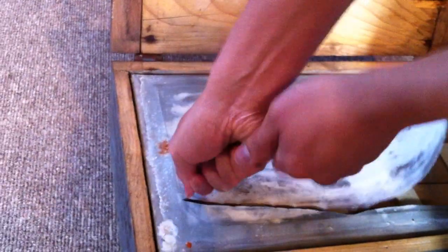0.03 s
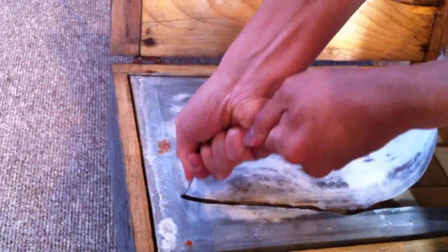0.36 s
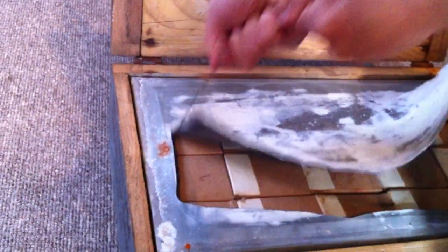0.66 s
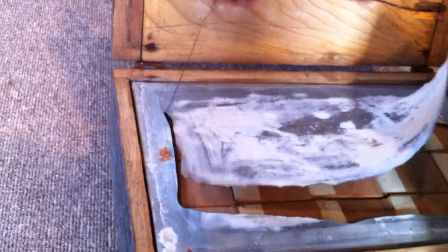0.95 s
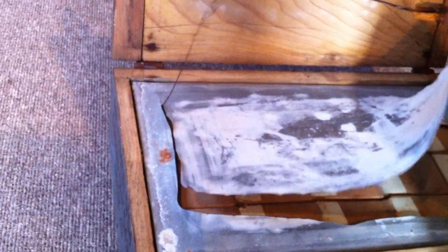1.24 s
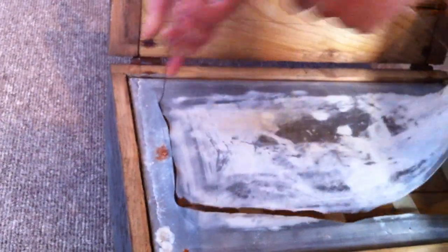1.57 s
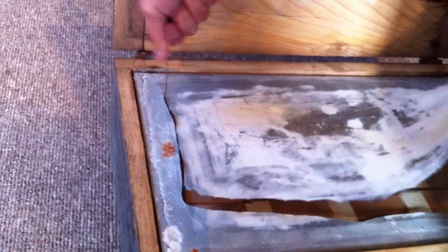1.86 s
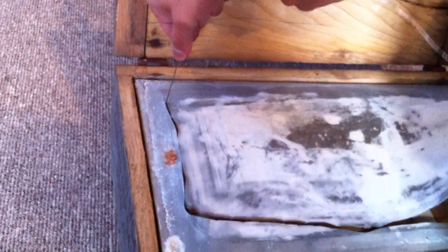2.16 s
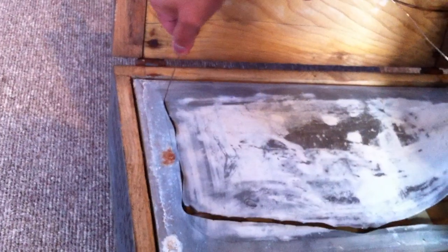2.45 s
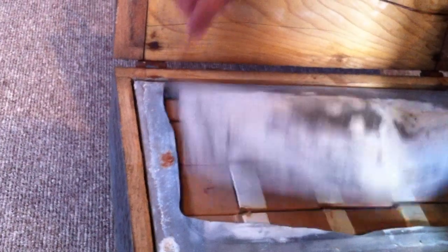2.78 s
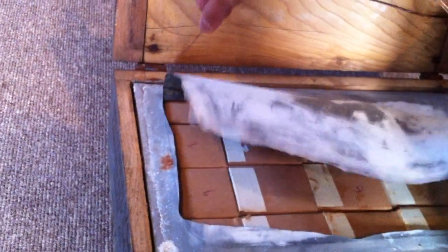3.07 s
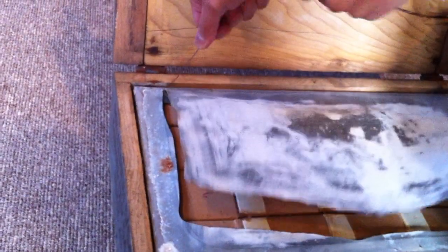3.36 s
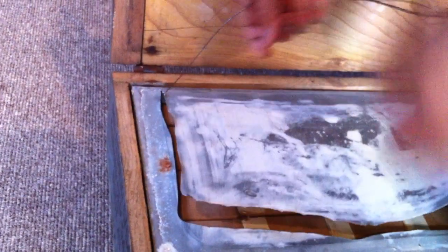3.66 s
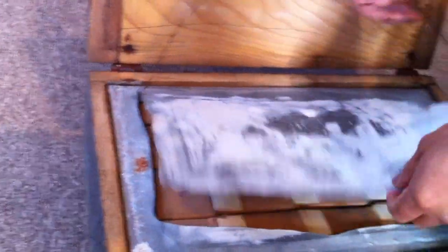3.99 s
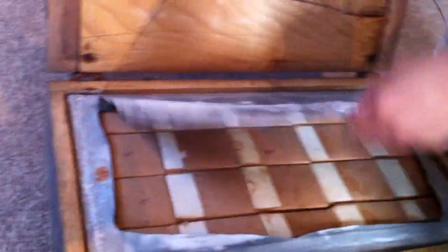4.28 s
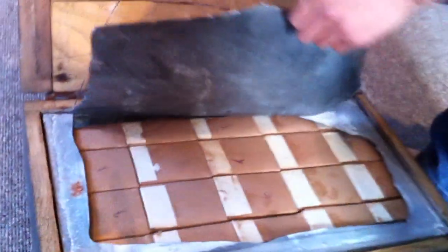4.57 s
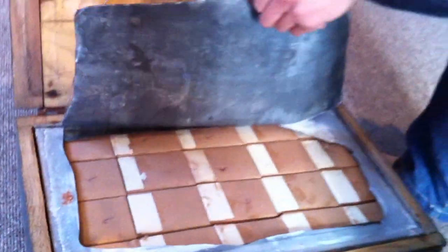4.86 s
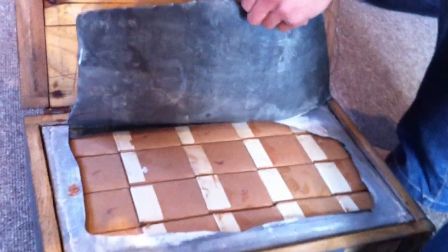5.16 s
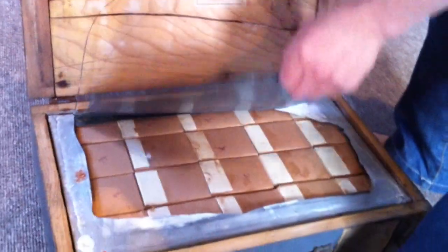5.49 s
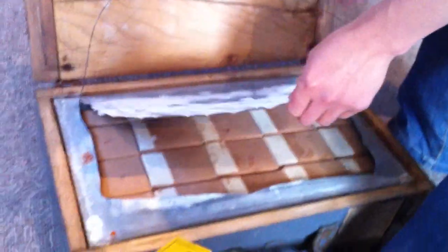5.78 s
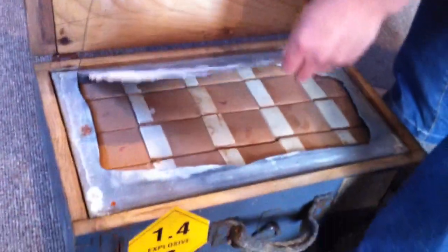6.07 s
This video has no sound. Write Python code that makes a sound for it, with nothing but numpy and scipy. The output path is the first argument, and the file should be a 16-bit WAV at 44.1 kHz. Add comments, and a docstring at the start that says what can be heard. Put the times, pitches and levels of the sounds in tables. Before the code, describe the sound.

Thin sheet metal is torn open with a pull wire and bent back by hand, popping, buckling and knocking in a small, quiet room.

```python
"""A faint slither of pull wire, then the thin sheet-metal liner of a wooden crate rips open and is peeled
back by hand. The seam gives way in runs of tiny cracks; the sheet snaps, buckles, wobbles and knocks
dully on the load below. Wire and fingers rub along the metal, and the released wire sings faintly.
Heard close to the crate in a small, quiet room, on one small microphone."""
import sys
import numpy as np
from scipy import signal
from scipy.fft import rfft, irfft
from scipy.io import wavfile
from scipy.ndimage import uniform_filter1d

SR = 44100
rng = np.random.default_rng(int(sys.argv[2]) if len(sys.argv) > 2 else 0)


def unload_wav(signal):
    """Save mono or channel-first audio to the path in sys.argv[1] as 16-bit WAV at rate SR, clipped to [-1, 1]."""
    wavfile.write(
        sys.argv[1],
        SR,
        np.round(np.clip(np.atleast_2d(signal).T, -1, 1) * 32767).astype(np.int16),
    )


N = 270333
TIME = np.arange(N) / SR


def snaps(typical_hz=1610, typical_t60_s=0.083, clang_db_per_octave=8.5, t60_growth_per_octave=1.5):
    """The sheet pops through or the seam breaks; a larger patch is lower, clangs more and rings longer."""
    # pops of the sheet: start_s, level_db (near 2 kHz), pitch_hz, edge_db, sizzle_db
    pops = [(0.5171, 9, 1100, -5, -4), (0.5391, 22, 1620, -16, -18.5), (0.554, 8.5, 2140, -11, -2.5),
            (0.7342, 8, 2190, -13.5, -12), (0.7713, 9, 2020, -14, -11), (0.786, 11.5, 2130, -23, -27),
            (0.805, 3.5, 1320, -27, -3), (0.871, 4, 1900, -12, -10.5), (1.317, -16, 2140, -7.5, -9),
            (2.1129, 7, 1760, -10.5, -13.5), (2.2187, 20.5, 2520, -5.5, -19.5),
            (2.8565, 18.5, 2050, -12, -25), (2.89, 11.5, 2020, 2, -1.5), (2.9041, 18.5, 1670, -35.5, -27),
            (2.9145, -6.5, 1360, -15.5, -11.5), (2.9464, 18, 2060, -11, -18.5),
            (3.1486, -9.5, 1340, -11, -17), (3.222, -14.5, 1700, -13.5, -16),
            (3.5102, -13, 2670, -4, -29.5), (4.0383, -26.5, 2300, -7, -20.5), (4.1632, 3.5, 2100, -6, -12),
            (4.314, -14.5, 1680, -19, -27), (4.3516, -13.5, 850, -13.5, -16), (4.377, 13, 783, -26.5, -46),
            (4.533, -8, 1450, -3, -4.5), (4.6, -7.5, 1870, -7.5, -8.5), (4.7059, -2.5, 1500, -18, -30),
            (5.0894, 16, 882, 1.5, -5), (5.0978, 21, 1120, -24, -20), (5.1527, 15, 1165, -4.5, -14.5),
            (5.164, 12.5, 900, -16, -25.5), (5.187, -4.5, 690, -12, -6), (5.2625, 6.5, 1250, -4.5, -10),
            (5.3838, -3.5, 915, -2.5, -8), (5.4937, 19.5, 2210, -10.5, -26)]
    # corners of a snap's spectrum, from sub-bass to sizzle: frequency_hz
    corners_hz = [30, 110, 165, 850, 2200, 5000, 7300, 9000, 14000]
    out = np.zeros(N)
    overtone_ratios = rng.uniform(1.2, 4.5, (len(pops), 9))   # inharmonic, so the sheet sounds tinny
    for (start_s, level_db, pitch_hz, edge, sizzle), ratios in zip(pops, overtone_ratios):
        octaves_down = np.log2(typical_hz / pitch_hz)
        clang = clang_db_per_octave * octaves_down
        t60_s = typical_t60_s * t60_growth_per_octave ** octaves_down
        thump = -7 - 0.3 * level_db   # the bass grows more slowly than the rest of the snap
        corners_db = [thump - 10, thump - 10, thump, clang, 0, edge, edge - 1, sizzle + 1, sizzle - 1]
        colour_db = at_hz(np.column_stack([corners_hz, corners_db]), bins())
        patch_db = 4.5 * (bump(pitch_hz, 0.52 * pitch_hz) - 0.3)
        overtones_db = 5 * np.max([bump(pitch_hz * ratio, width_hz=90) for ratio in ratios], axis=0)
        ring = burst(t60_s, crack=1.3, crack_s=0.0018, rise_s=0.0005)
        add(out, start_s, shape(ring, level_db + colour_db + patch_db + overtones_db))
    return out


def tearing():
    """The wire splits the seam in runs of tiny cracks of uneven size."""
    # runs of the tear: start_s, length_s, level_db
    runs = [(0.517, 0.075, -30.5), (0.58, 0.31, -36.5), (0.645, 0.039, -28.5), (0.735, 0.093, -32),
            (0.908, 0.013, -38), (2.88, 0.066, -37.5)]
    # spectrum of the cracks: frequency_hz, level_db
    colour = [(40, -13), (100, -13), (160, -16.5), (330, -1), (620, 7.5), (950, -3), (1500, 4.5), (2400, 0),
              (3500, -8), (7000, -12.5), (12000, -16), (16000, -16)]
    gain = strokes(runs, attack_s=0.0096, release_s=0.011, swell_db=1, rest_db=-110)
    return gain * friction(colour, per_s=1800, spread_db=3, jerk_db=0.5)


def knocks(lowest_hz=150, pitch_share=0.54):
    """Soft contacts excite the low modes, one of them most; the softer the contact, the lower that mode."""
    # sheet and hands striking the crate: start_s, level_db, cutoff_hz, t60_s
    contacts = [(0.458, 10, 920, 0.029), (0.518, 17.5, 644, 0.07), (0.543, 23.5, 630, 0.013),
                (0.555, 12.5, 480, 0.075), (0.587, 14, 323, 0.036), (0.874, 10, 540, 0.067),
                (1.149, 3, 317, 0.06), (1.413, -4, 540, 0.091), (1.532, 13.5, 916, 0.15),
                (1.753, 10, 443, 0.03), (2.19, 4.5, 300, 0.022), (2.659, -11, 500, 0.08),
                (2.95, 15, 384, 0.066), (3.344, -12.5, 430, 0.04), (4.366, 5.5, 760, 0.092),
                (4.378, 12, 804, 0.1), (4.413, 0, 400, 0.12), (4.475, 7.5, 1090, 0.06),
                (4.918, -10, 1250, 0.32), (5.403, 4, 1220, 0.23), (5.849, 1.5, 610, 0.17),
                (6.004, 1.5, 680, 0.091), (6.032, 0, 520, 0.095), (6.094, -2.5, 498, 0.05)]
    out, hz = np.zeros(N), bins() + 1
    highpass_power = 1 / (1 + (lowest_hz / hz) ** 8) + 0.00078
    for start_s, level_db, cutoff_hz, t60_s in contacts:
        pitch_hz = pitch_share * cutoff_hz
        lowpass_power = 1 / (1 + (hz / cutoff_hz) ** 6) + 1e-5
        band_db = 10 * np.log10(lowpass_power * highpass_power)
        mode_db = 3 * (bump(pitch_hz, 0.62 * pitch_hz) - 0.3)
        ring = burst(t60_s, crack=0.44, crack_s=0.0053, rise_s=0.001)
        add(out, start_s, shape(ring, level_db + band_db + mode_db))
    return out


def rubbing(treble_hz=4000):
    """Metal and fingers drag over the sheet in fine slips; each stroke has its own share of treble."""
    # rubbing strokes: start_s, length_s, level_db, brightness_db
    rubs = [(0.095, 0.025, -60, 0), (0.291, 0.019, -54, -13), (0.999, 0.073, -45, -3.5),
            (1.11, 0.048, -40, 0), (1.289, 0.022, -60.5, 2), (1.444, 0.072, -59, -11),
            (2.653, 0.02, -59, -3), (2.699, 0.097, -62, -6.5), (3.607, 0.11, -59.5, 2.5),
            (3.712, 0.025, -49.5, -8), (3.757, 0.04, -51, 0), (4.111, 0.037, -50, -2),
            (4.21, 0.065, -66, 4), (4.545, 0.05, -48, 3), (4.595, 0.02, -32.5, -3.5),
            (4.632, 0.016, -37.5, -0.5), (4.902, 0.057, -63, 6), (4.982, 0.14, -61, -1),
            (5.387, 0.047, -43.5, -8.5), (5.444, 0.065, -39.5, -23), (6.066, 0.07, -63.5, 0)]
    # spectrum of the slips: frequency_hz, level_db
    colour = [(40, -5), (170, -23), (450, 2), (900, 2), (2300, 6.5), (3800, -2.5), (7000, -5.5),
              (12000, -8), (16000, -4.5)]
    slips = friction(colour, per_s=3300, spread_db=0.5, jerk_db=0.5)
    treble = signal.sosfilt(signal.butter(1, treble_hz, "high", fs=SR, output="sos"), slips)
    motion = dict(attack_s=0.012, release_s=0.013, swell_db=1.5, rest_db=-76.5)
    body_gain = strokes([(s, length, db) for s, length, db, _ in rubs], **motion)
    treble_gain = strokes([(s, length, db + bright) for s, length, db, bright in rubs], **motion)
    return body_gain * (slips - treble) + treble_gain * treble


def wire(let_go_s=1.57, rise_s=0.019, waver_hz=20):
    """The wire hisses through the fingers and, once let go, rings faintly and unsteadily."""
    # modes of the slack wire: pitch_hz, level_db, t60_s
    modes = [(2330, -47.5, 0.71), (2530, -53.5, 1.2), (3155, -50, 0.46), (1340, -58.5, .8),
             (1650, -61, 1.3)]
    # slides through the fingers: start_s, length_s, level_db
    slides = [(0, 0.41, -65), (0.09, 0.091, -65), (1.3, 0.33, -64.5), (1.56, 0.45, -57.5),
              (2.025, 0.013, -63)]
    # spectrum of the sliding hiss: frequency_hz, level_db
    colour = [(40, -30), (1200, -3.5), (2500, 1.5), (4000, -6.5), (9000, -9.5), (11500, -6), (12300, 0),
              (13200, -2.5), (16000, -3)]
    age, song = np.maximum(TIME - let_go_s, 0), 0
    for pitch_hz, level_db, t60_s in modes:
        wavering_hz = pitch_hz + waver_hz * flutter(35)   # the tension keeps changing
        envelope = from_db(level_db - 60 * age / t60_s) * flutter(40)
        song = song + envelope * np.sin(2 * np.pi * np.cumsum(wavering_hz) / SR)
    hiss = rms_one(shape(grains(per_s=7900, spread_db=2.5), at_hz(colour, bins())))
    hiss_gain = strokes(slides, attack_s=0.035, release_s=0.05, swell_db=-4.5, rest_db=-88.5)
    return song * (1 - np.exp(-age / rise_s)) + hiss_gain * hiss


def wobbling():
    """The handled sheet flexes with a low, jerky rumble."""
    # spells of flexing: start_s, length_s, level_db
    flexes = [(0, 0.35, -66), (0.86, 0.28, -52), (1.55, 0.23, -65), (1.88, 0.42, -68.5),
              (3.77, 0.043, -58.5), (4.4, 0.08, -52.5), (5.36, 0.078, -64), (5.86, 0.2, -63),
              (6.07, 0.051, -56)]
    # spectrum of the rumble: frequency_hz, level_db
    colour = [(40, -25.5), (120, -8.5), (190, -1.5), (300, 3.5), (500, -3.5), (900, -9), (2000, -31),
              (16000, -60)]
    gain = strokes(flexes, attack_s=0.032, release_s=0.07, swell_db=-0.5, rest_db=-92)
    return gain * friction(colour, per_s=260, spread_db=-0.5, jerk_db=4.5)


def liner(x, valley_db=-4, valley_below_hz=3000):
    """The liner's strongest modes ring on under every blow."""
    # resonances of the liner in its crate: pitch_hz, width_hz, lift_db
    modes = [(164, 4.7, 8), (197, 24, 6), (261, 17, 4), (329.5, 16, 5), (367, 11, 1.5), (435, 4.7, 2),
             (657, 46, 3), (877, 16, 2.5), (1014, 8.5, 0.5), (1101, 30, 3.5), (1291, 22, 6.5),
             (1500, 21, 3), (1650, 20, 0), (1740, 22, 0), (2090, 23, 0), (2680, 240, 2.5)]
    peaks_db = sum(lift_db * bump(pitch_hz, width_hz) for pitch_hz, width_hz, lift_db in modes)
    return shape(x, peaks_db + valley_db / (1 + (bins() / valley_below_hz) ** 2))


def room(x, build_s=0.0011, early_s=0.038, size=32768):
    """Direct sound, early bounces off crate and lid, then a diffuse tail, shortest in the high treble."""
    # decay of the small room: frequency_hz, t60_s
    decay = [(100, 0.59), (300, 0.54), (900, 0.51), (2300, 0.67), (6000, 0.56), (14000, 0.35)]
    # reverberation against the direct sound: frequency_hz, level_db
    send = [(100, -7), (300, 0.5), (900, -5), (2300, -9.5), (6000, -11), (14000, -18)]
    t, response = np.arange(size) / SR, signal.unit_impulse(size)
    noise_spectrum = rfft(rng.standard_normal(size))
    centres_hz = np.geomspace(100, 14000, num=8)
    build_up = 1 - np.exp(-(t / build_s) ** 2)
    for hz, share in zip(centres_hz, np.eye(len(centres_hz))):
        fade = build_up * (from_db(-60 * t / at_hz(decay, hz)) + np.exp(-t / early_s))
        band = irfft(noise_spectrum * at_hz(np.column_stack([centres_hz, share]), bins(size)))
        response = response + band * fade / np.linalg.norm(fade) * from_db(at_hz(send, hz))
    return signal.fftconvolve(x, evened(response, size=41))[:N]


def room_tone(level_db=-67):
    """The steady, low hush of the room."""
    # spectrum of the hush: frequency_hz, level_db
    colour = [(30, -20), (55, -19.5), (100, -6.5), (170, 0), (310, -4), (700, -12.5), (1300, -9.5),
              (2400, -13.5), (4500, -16), (9000, -16.5), (16000, -17)]
    return from_db(level_db) * rms_one(shape(rng.standard_normal(N), at_hz(colour, bins())))


def friction(colour, per_s, spread_db, jerk_db, spots=4):
    """Jerky runs of tiny slips at several spots, each ringing briefly in the sheet; rms 1."""
    slips = 0
    for _ in range(spots):
        run = grains(per_s / spots, spread_db) * from_db(jerk_db * flutter(50))
        ring = burst(t60_s=0.0087, crack=8.3, crack_s=0.00024, rise_s=0.00005)
        slips = slips + signal.oaconvolve(run, ring)[:N]
    return rms_one(shape(slips, at_hz(colour, bins())))


def burst(t60_s, crack, crack_s, rise_s, size=8192):
    """A crack and the dying ring of countless plate modes, with a level spectrum of height 1."""
    t = np.arange(size) / SR
    fade = from_db(-60 * t / t60_s) + crack * np.exp(-t / crack_s)
    rise = 1 - np.exp(-t / rise_s)
    return evened(rng.standard_normal(size) * rise * fade, size=65)


def grains(per_s, spread_db):
    """Tiny clicks of random size at random moments; rms 1."""
    sizes = from_db(spread_db * np.minimum(rng.exponential(1, N), 4))
    signs = rng.choice([-1, 1], N)
    return rms_one(sizes * signs * (rng.random(N) < per_s / SR))


def strokes(rows, attack_s, release_s, swell_db, rest_db):
    """Gain of a series of hand strokes: each sets in, holds while the pressure changes, and dies away."""
    t, gain = TIME[::32], from_db(rest_db)
    for start_s, length_s, level_db in rows:
        age = np.maximum(t - start_s, 0)
        attack = 1 - np.exp(-(age / attack_s) ** 2)
        release = np.exp(-np.maximum(age - length_s, 0) / release_s)
        pressure_db = swell_db * (np.minimum(age / length_s, 1) - 0.5)
        gain = gain + attack * release * from_db(level_db + pressure_db)
    return np.interp(TIME, t, gain)


def flutter(rate_hz):
    """Random wander, mostly slower than rate_hz; rms 1."""
    pole = np.exp(-2 * np.pi * rate_hz / SR)
    return rms_one(signal.lfilter([1], [1, -2 * pole, pole * pole], rng.standard_normal(N)))


def shape(x, gain_db):
    """Causal (minimum-phase) filter with the given gain at each of the bins."""
    cepstrum = irfft(np.log(from_db(gain_db)))
    half = len(cepstrum) // 2
    folded = np.concatenate([cepstrum[:1], 2 * cepstrum[1:half], np.zeros(half)])
    return signal.oaconvolve(x, irfft(np.exp(rfft(folded))))[:len(x)]


def evened(x, size):
    """Level the spectrum, averaged over size bins, to height 1; the fine resonances stay."""
    power = uniform_filter1d(np.abs(rfft(x)) ** 2, size=size)
    return shape(x, -10 * np.log10(np.abs(power) + 1e-12))


def bump(hz, width_hz):
    """Shape of a resonance over the bins, height 1."""
    return 1 / (1 + (2 * (bins() - hz) / width_hz) ** 2)


def bins(size=8192):
    """Frequencies on which filters are drawn."""
    return np.fft.rfftfreq(size, 1 / SR)


def at_hz(points, hz):
    """Read a curve on a log-frequency axis."""
    freqs, values = np.transpose(points)
    return np.interp(np.log(hz + 1), np.log(freqs), values)


def add(out, start_s, sound):
    """Mix a sound in at start_s."""
    start = int(round(start_s * SR))
    out[start:start + len(sound)] += sound[:N - start]


def from_db(db):
    """Decibels to gain."""
    return 10 ** (np.asarray(db) / 20)


def rms_one(x):
    """Scale to rms 1."""
    return x / np.sqrt(np.mean(x ** 2) + 1e-20)


def scene():
    """The sheet sounds through the liner's modes; sheet and wire then carry into the room."""
    tear, wobble = tearing(), wobbling()
    at_crate = liner(snaps() + knocks() + tear + rubbing() + wobble) + wire()
    hush = room_tone()
    return (room(at_crate) + hush)[None]


def record(dry, cutoff_hz=15850):
    """One small microphone with a port resonance in the high treble; the top is cut."""
    # response of the microphone: frequency_hz, gain_db
    response = [(30, -0.5), (3000, -1), (3600, -1.5), (5000, 0.5), (7000, -2), (8500, -4.5), (9700, -3),
                (11300, 2.5), (13500, -3.5), (16000, -7.5)]
    coloured = shape(dry[0], at_hz(response, bins()))
    lowpass = signal.ellip(10, 0.2, 70, cutoff_hz, fs=SR, output="sos")
    return signal.sosfilt(lowpass, coloured)[None]


dry = scene()
out = record(dry)
unload_wav(out)
```